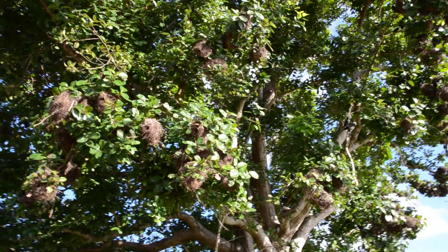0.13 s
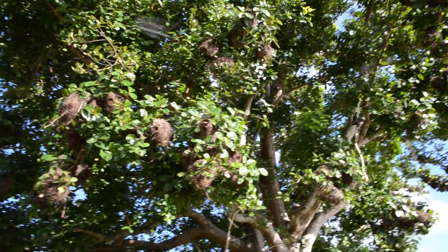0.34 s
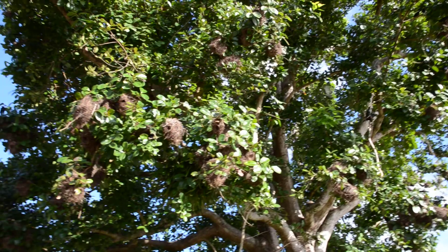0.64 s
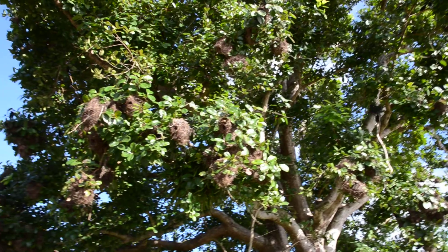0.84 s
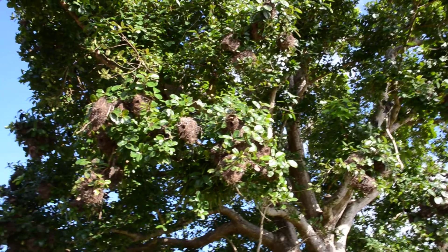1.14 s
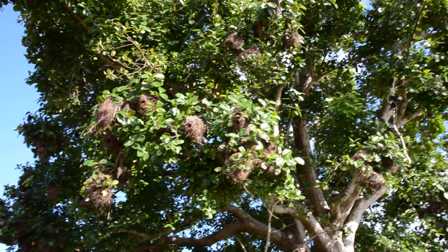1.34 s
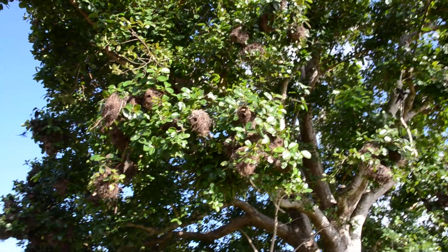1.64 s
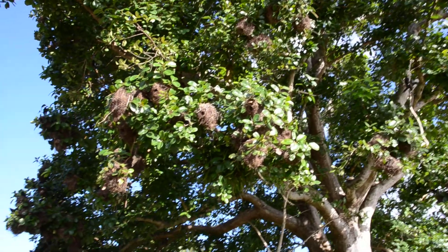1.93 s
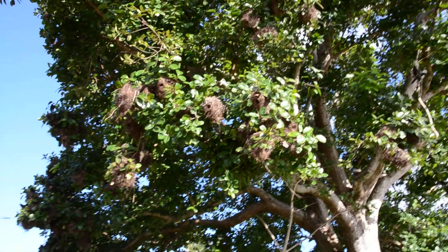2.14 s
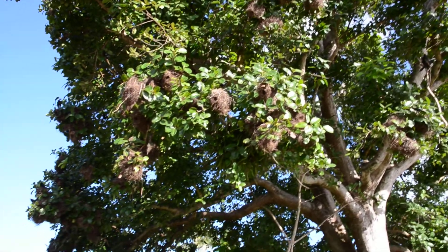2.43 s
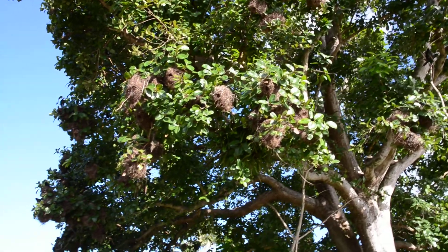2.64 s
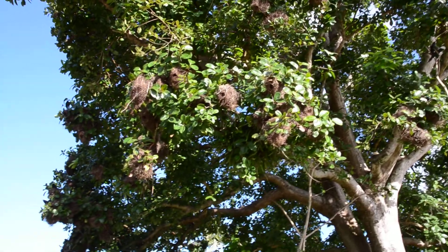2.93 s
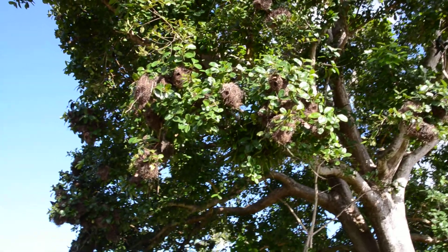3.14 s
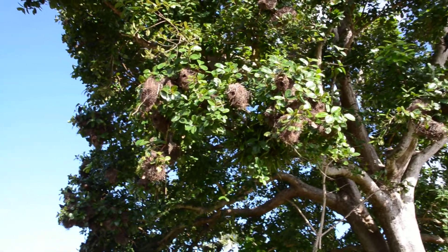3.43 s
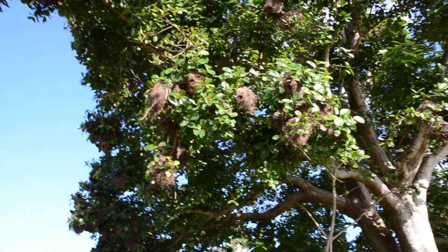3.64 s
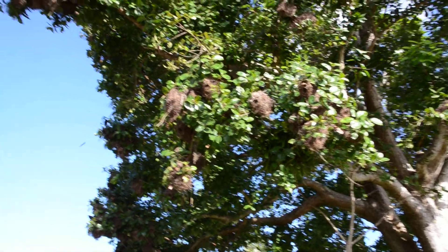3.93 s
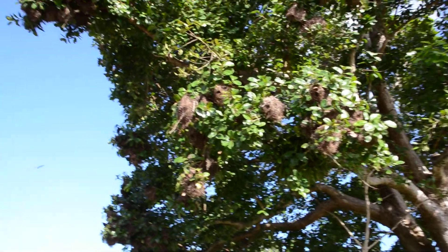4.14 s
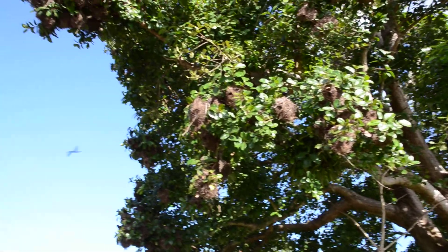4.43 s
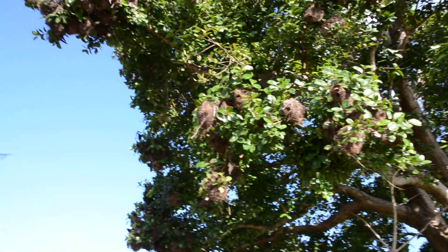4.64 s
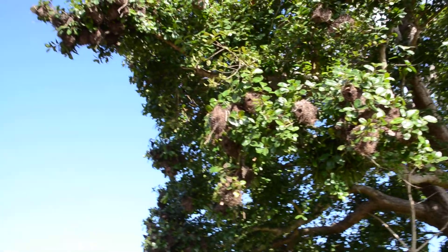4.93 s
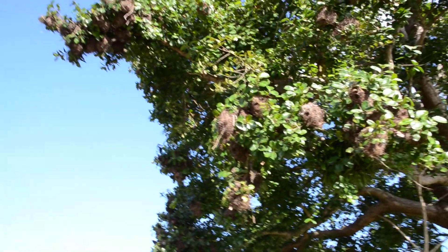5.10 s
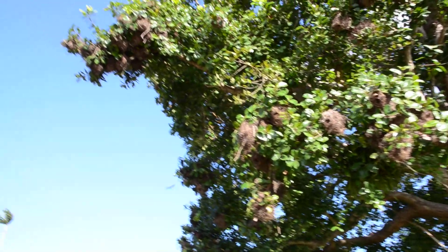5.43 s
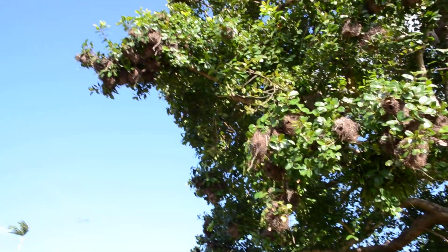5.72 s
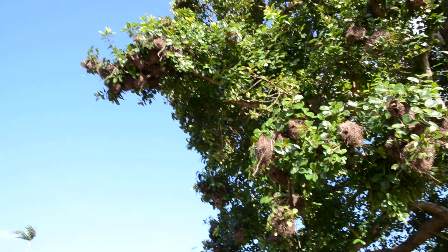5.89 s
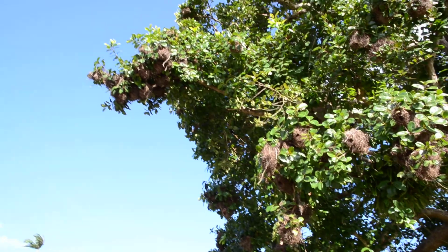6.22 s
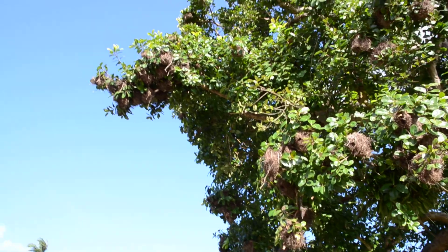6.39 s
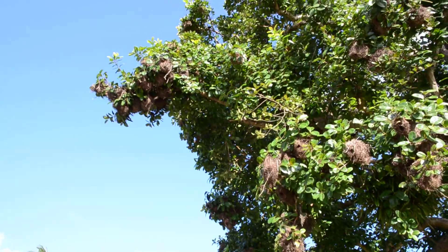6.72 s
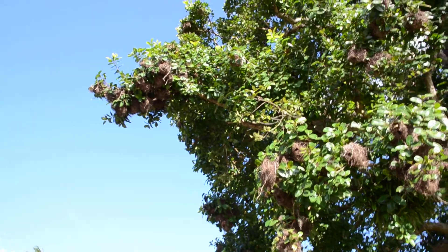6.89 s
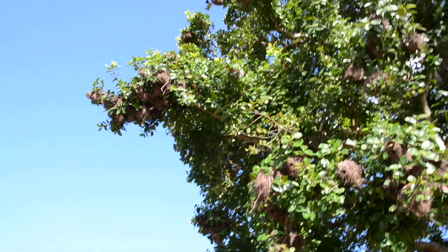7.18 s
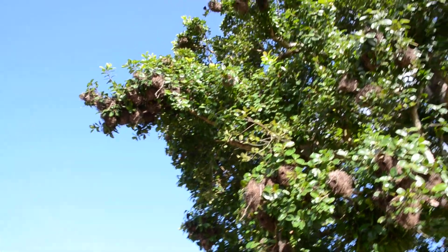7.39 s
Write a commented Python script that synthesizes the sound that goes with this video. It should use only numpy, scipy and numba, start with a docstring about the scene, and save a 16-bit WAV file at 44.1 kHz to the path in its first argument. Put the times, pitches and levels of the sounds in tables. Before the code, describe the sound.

A hand-held microphone faces a noisy bird colony in a tree. Low wind thumps open the scene over shrill continuous chatter, then mostly subside, with short puffs returning. Close birds give bright chirps, paired whistles and a reedy falling phrase; from the middle, one repeats a sagging whistle. The crowd behind swells and briefly hushes, never stopping, with slight leafy scatter and the same sound in both channels.

```python
"""Starlings chatter in a tall tree: close birds give short gliding whistles, often two at once, made of bent sines.
One of them sings a falling, reedy phrase in three harmonics; others repeat drooping whistles and two-voiced calls.
Behind them thousands of short raspy notes and a band of noise blur into a chorus among the leaves.
Wind buffets the port of one hand-held microphone as lumpy low noise and thumps, over a faint far rustle."""
import sys
import numpy as np
from scipy import signal
from scipy.fft import rfft, irfft
from scipy.io import wavfile
from scipy.ndimage import uniform_filter1d
from numba import njit

SR = 44100
rng = np.random.default_rng(int(sys.argv[2]) if len(sys.argv) > 2 else 0)


def dump(signal):
    """Clip the signal to [-1, 1] and save it as 16-bit WAV at the path in sys.argv[1]."""
    limited = np.clip(np.atleast_2d(signal).T, -1, 1)
    pcm = np.round(limited * 32767).astype(np.int16)
    wavfile.write(sys.argv[1], SR, pcm)


N = 332955
TOP_HZ = 15300  # upper limit of the sound


def undb(db):
    """Amplitude ratio of a level in dB."""
    return 10 ** (np.asarray(db) / 20)


def level(x, db):
    """Scale a sound to an RMS level in dB."""
    return x * undb(db) / np.sqrt(np.mean(x ** 2))


def curve(table):
    """Columns of a time table, one value per sample."""
    s, *columns = np.transpose(table)
    return [np.interp(np.arange(N) / SR, s, c) for c in columns]


def density_db(points, hz):
    """Spectral density between the given points, straight in dB over log frequency."""
    point_hz, point_db = np.array(points).T
    return np.interp(np.log(hz), np.log(point_hz), point_db)


def coloured(points):
    """Noise with the given spectrum."""
    hz = np.maximum(np.fft.rfftfreq(N, 1 / SR), 1)
    return irfft(rfft(rng.standard_normal(N)) * undb(density_db(points, hz)), N)


def band(x, lo_hz, hi_hz):
    """Keep the sound between two frequencies, with gentle skirts."""
    return signal.sosfilt(signal.butter(2, [lo_hz, hi_hz], "bandpass", fs=SR, output="sos"), x)


def walk(rate_hz):
    """Random values, drawn rate_hz times a second and slewed; spread near 1."""
    hold = int(SR / rate_hz)
    steps = np.repeat(rng.standard_normal(N // hold + 1), hold)
    return uniform_filter1d(steps, hold)[:N]


def far_rustle():
    """Faint broadband rustle in the distance: shaped noise whose level wanders slowly."""
    # relative spectrum of the rustle: pitch_hz [Hz], density_db [dB per Hz]
    rustle_spectrum = [(40, 4.5), (150, 0), (400, 4.5), (1000, 5.5), (2200, -9), (9000, -45)]
    return level(coloured(rustle_spectrum), -47) * undb(walk(4.64))


def gust_level_db():
    """Wind level in dB: each gust rises, holds and falls back to the calm."""
    # long gusts and brief puffs at the port: start_s [s], end_s [s] of the hold, level_db [dB]
    gust_holds = [(0, 0.302, -30), (0.368, 0.916, -31), (0.949, 1.2, -46.5), (1.553, 1.726, -34),
                  (1.786, 1.818, -39.5), (2.668, 2.86, -32), (2.86, 3.012, -35), (3.262, 3.304, -39.5),
                  (3.922, 3.95, -42), (4.16, 4.192, -40.5), (4.523, 4.542, -43), (6.356, 6.364, -39)]
    calm_db, edge_db_per_s = -53.5, 300
    t = np.arange(N) / SR
    db = np.full(N, calm_db)
    for start, end, gust_db in gust_holds:
        outside_s = np.maximum(0, np.maximum(start - t, t - end))
        db = np.maximum(db, gust_db - edge_db_per_s * outside_s)
    return db


def wind_rumble(bright=0.88):
    """Eddies break on the port in lumps; stronger wind sheds smaller, higher eddies."""
    gust_db = gust_level_db()
    lumps = undb(7.1 * np.tanh(walk(45)))
    grit = undb(13 * np.tanh(walk(70)))  # quick scatter of the small eddies
    large = level(band(rng.standard_normal(N), 59, 194) * lumps, -0.58)
    small = band(band(rng.standard_normal(N), 68, 365), 124, 1250)
    small = level(small * lumps * grit, -6)
    # the small eddies gain a further 0.88 dB for every dB of wind
    return undb(gust_db) * (large + small * undb(bright * (gust_db + 35.0)))


def buffets():
    """The hardest buffets: a few swings of the diaphragm that quicken as they die, bent by its stiffness."""
    # thumps at the port: start_s [s], relative level_db [dB], pitch_hz [Hz] that scales the swings
    thumps = [(0.035, -28, 290), (.127, -5, 264), (.243, -20, 251), (0.423, -13.5, 148), (.55, -20, 127.5),
              (.712, -16.5, 164.3), (.804, -17, 159), (.87, -20, 210), (1.64, -19.5, 231),
              (1.673, -18, 188), (1.789, -28, 160), (2.674, -22, 169), (2.734, -25, 167), (2.792, -23, 325),
              (2.811, -15.5, 337)]
    out = np.zeros(N)
    for s, db, hz in thumps:
        t = np.arange(int(3.5 * SR / hz)) / SR
        swing = np.sin(2 * np.pi * hz * t * (0.72 + 0.13 * hz * t))
        swing = swing * np.sqrt(hz * t) * np.exp(-hz * t / 1.48)
        slope = np.diff(swing, prepend=0) * SR / (2 * np.pi * hz)
        first = int(s * SR)
        out[first:first + len(t)] += undb(db) * 1.5 * (swing + 2.0 * swing * slope)
    return out


def leaves(x, t60_s=0.16, scatter_db=-13):
    """Scatter from foliage and ground: a short fading tail of noise behind the direct sound."""
    t = np.arange(int(.4 * SR)) / SR
    tail = rng.standard_normal(len(t)) * undb(-60 * t / t60_s) * (t > .004)
    tail = tail * undb(scatter_db) / np.linalg.norm(tail)
    return x + signal.fftconvolve(x, tail)[:N]


@njit
def sing(notes, waver, rasp, edge):
    """Sine notes (start, length, three pitches, dB, swell dB); pitch bends through the three, wavers and rasps."""
    out = np.zeros(len(waver))
    for start, length, a, b, c, db, swell_db in notes:
        first, count, phase = int(start * SR), int(length * SR), 0.
        gain = np.sqrt(2) * 10 ** ((db - swell_db / 2) / 20)
        grow = 10 ** (swell_db / 20 / count)
        shift = int(70 * b)  # notes of different pitch meet different stretches of chance
        for i in range(max(0, -first), min(count, len(out) - first)):
            u = 2 * i / count - 1  # -1 at the start of the note, 0 in the middle, 1 at the end
            k = (first + i + shift) % len(out)
            hz = b + u * (c - a) / 2 + u * u * ((a + c) / 2 - b) + waver[k]
            phase += 2 * np.pi * hz / SR
            gain *= grow
            fade = min(1., i / edge, (count - i) / edge)
            out[first + i] += gain * rasp[k] * fade * np.sin(phase)
    return out


def play(rows, waver_hz, rough, edge_s):
    """Notes with randomly unsteady pitch and a quick random flutter of the throat."""
    return sing(np.array(rows, float), waver_hz * walk(200), 1 + rough * walk(500), edge_s * SR)


def chorus_notes(voices, count=2000, spread_db=3.5, fall_hz=90, fade_db=-4, octave_db=3):
    """Short raspy notes at random, each with its octave; most fall, a few steeply, and others rise."""
    u, g = rng.random((count, 3)).T, rng.standard_normal((count, 3)).T
    hz = 1200 + 6200 * u[0]
    steep = np.clip((.5 + g[0]) ** 3, -8, 12)
    start_s = u[2] * N / SR
    length_s = (0.01403 + 0.062 * u[1] ** 2) / (1 + 0.1163 * np.abs(steep))  # steep notes are shorter
    pitches = np.array([hz + fall_hz * steep, hz + .6 * fall_hz * g[1], hz - fall_hz * steep])
    loud_db = spread_db * np.tanh(g[2])
    rows = []
    for k, db in (1, 0), (2, octave_db):
        weight_db = np.minimum(density_db(voices, k * hz), density_db(voices, hz))
        rows.append([start_s, length_s, *(k * pitches), weight_db + loud_db + db, fade_db + 0 * hz])
    return play(np.hstack(rows).T, waver_hz=70, rough=0.43, edge_s=0.0034)


def chorus(blur_db=-3):
    """The colony in the tree: many notes, while the furthest birds merge into a hiss; it swells and hushes."""
    # relative spectrum of the voices: pitch_hz [Hz], density_db [dB per Hz]
    voices = [(590, -57), (1000, -16.5), (1520, -16), (2260, -5), (3480, 0), (4890, 1.5), (5660, -1),
              (6200, -4), (7100, -8), (9210, -6.5), (12500, -29), (14200, -31.5), (15000, -57)]
    # course of the chorus before hushes and bursts: time_s [s], level_db [dB],
    # treble_db [dB], the treble birds above or below that level
    swells = [(0, -24, -4), (.43, -22.5, -6.5), (.95, -26, -2.5), (1.02, -20.5, -12), (1.35, -25.5, -3.5),
              (1.69, -22.5, -9), (1.9, -25, -6.5), (2.2, -23, -7.5), (2.95, -27, -4), (3.03, -20.5, -9.5),
              (3.21, -26.5, -9), (3.52, -23.5, -6), (4.13, -22, -5.5), (4.65, -23.5, -7.5),
              (4.88, -20, -8.5), (5.29, -24, -7), (5.41, -21, -8), (6.14, -25.5, -2), (6.43, -24.5, -2.5),
              (6.8, -25.5, -2), (7.17, -26, -1), (7.4, -27, 0)]
    # the colony hushes for a moment: middle_s [s], half_length_s [s], depth_db [dB] below the treble
    lulls = [(0.29, 0.05, -2), (1.845, 0.025, -3), (2.481, 0.031, -2.5), (3.756, 0.084, -4),
             (4.248, 0.031, -3.5), (5.295, 0.061, -4), (6.695, 0.073, -1.5), (7.165, 0.064, -3.5)]
    lull_treble = 2.16  # depth in the treble, times the depth below

    crowd = level(chorus_notes(voices), 0) + level(coloured(voices), blur_db)
    low_db, treble_db = curve(swells)
    t = np.arange(N) / SR
    lull_db = sum(db * np.exp(-((t - s) / half) ** 2) for s, half, db in lulls)
    low_db = low_db + lull_db
    low_db = low_db + 1.0 * np.tanh(walk(18))  # bursts of chatter lift all voices together
    treble_db = treble_db + (lull_treble - 1) * lull_db + 0.66 * np.tanh(walk(16))
    low, high = (signal.sosfilt(signal.butter(4, 5800, kind, fs=SR, output="sos"), crowd)
                 for kind in ("low", "high"))
    return level(low, 0) * undb(low_db) + level(high, 0) * undb(low_db + treble_db)


def arches():
    """A thin, very high call that arches up and down again."""
    # calls: start_s [s], level_db [dB]
    arch_calls = [(3.285, -44), (3.585, -49), (3.8, -49), (4.238, -49), (7.438, -53)]
    length_s, foot_hz, top_hz = 0.033, 10300, 11900
    return [(s, length_s, foot_hz, top_hz, foot_hz, db, -1.5) for s, db in arch_calls]


def droops():
    """One bird repeats a whistle that sags, then drops at its end."""
    # whistles: start_s [s], length_s [s] before the drop, first pitch_hz [Hz], level_db [dB]
    droop_calls = [(4.488, .11, 2893, -28), (4.738, 0.11, 2940, -23.5), (5.038, 0.055, 2960, -27.5),
                   (5.335, 0.066, 3040, -28.5), (5.636, .075, 2995, -26), (5.872, 0.091, 2970, -23.5),
                   (6.256, 0.055, 2994, -24)]
    sag_hz, drop_hz, drop_s, drop_fade_db = 232.8, 609, 0.0147, -2.5
    rows = []
    for s, d, hz, db in droop_calls:
        end_hz = hz - sag_hz
        rows.append((s, d, hz, hz - sag_hz / 3, end_hz, db, 1.5))
        rows.append((s + d - .002, drop_s, end_hz, end_hz - drop_hz / 3, end_hz - drop_hz,
                     db + drop_fade_db / 2, drop_fade_db))
    return rows


def reedy_phrase():
    """One bird's falling, reedy phrase: each note is three harmonics that glide together and ease off."""
    # notes: start_s [s], length_s [s], first_hz [Hz], last_hz [Hz], reference level_db [dB] of the harmonics
    reedy_notes = [(1.455, 0.065, 1847, 1810, -30), (1.512, 0.02, 1963, 1480, -27),
                   (1.53, 0.063, 1470, 1402, -32), (1.636, 0.085, 1410, 1218, -34),
                   (2.958, 0.049, 1900, 1754, -29), (3.018, 0.027, 1720, 1365, -32),
                   (3.045, 0.05, 1340, 1300, -38), (3.14, 0.07, 1321, 1254, -35),
                   (3.235, .13, 1227, 1096, -42), (3.58, 0.089, 1190, 1107, -39),
                   (3.779, 0.089, 1143, 1137, -38.5), (4.246, 0.076, 1150, 1132, -38)]
    # harmonics: multiple of the pitch [ratio], level_db [dB] over the reference
    harmonics = [(1, -5.5), (2, 6.5), (3, -1)]
    bend = 0.75  # share of the glide done at the middle of a note
    return [(s, d, k * a, k * (a + bend * (c - a)), k * c, db + order_db, -1.5)
            for k, order_db in harmonics for s, d, a, c, db in reedy_notes]


def whistles():
    """Near whistles, each a glide that eases off, with a faint octave where it stays in range."""
    # whistles: start_s [s], length_s [s], first_hz [Hz], last_hz [Hz], level_db [dB]
    whistle_notes = [(0.963, 0.031, 3727, 3490, -13), (1.007, 0.026, 4340, 4150, -16.5),
                     (1.052, 0.047, 3500, 3430, -24.5), (1.115, 0.05, 3880, 3610, -17.5),
                     (1.563, .059, 6840, 6200, -30), (2.094, .045, 2540, 2680, -29),
                     (2.364, 0.027, 6560, 6550, -28), (2.604, .04, 4970, 4960, -22.5),
                     (2.854, 0.088, 3370, 3080, -30.5), (2.934, 0.15, 6490, 5820, -29.5),
                     (3.188, 0.08, 3950, 3790, -25), (3.19, 0.055, 9700, 9650, -35),
                     (3.314, 0.025, 6700, 6260, -27.5), (3.58, 0.12, 6500, 5990, -28),
                     (3.787, 0.1, 9850, 9700, -41), (3.879, .014, 9700, 8100, -32),
                     (3.897, .06, 4520, 4530, -28.5), (4.1, 0.03, 6680, 6680, -23),
                     (4.27, 0.17, 9750, 9600, -39), (4.288, 0.088, 3420, 2730, -26),
                     (4.567, 0.041, 3340, 3124, -26.5), (4.605, 0.048, 5370, 5330, -26),
                     (4.82, 0.031, 6650, 6600, -24), (5.182, 0.036, 7730, 7800, -26.5),
                     (5.256, 0.14, 3740, 3660, -28), (5.203, 0.048, 2860, 2830, -28.5),
                     (5.859, 0.037, 4700, 4150, -19), (5.859, 0.019, 9200, 8570, -25),
                     (5.898, 0.043, 4840, 4790, -14.5), (5.921, 0.046, 4410, 4240, -20.5),
                     (6.194, 0.039, 4730, 4490, -17), (6.226, .03, 4550, 2266, -26),
                     (6.359, 0.041, 3980, 3900, -24), (6.403, 0.014, 1099, 739, -34.5),
                     (6.43, 0.047, 6320, 6100, -24), (6.751, 0.029, 7870, 8050, -25),
                     (6.774, 0.067, 7900, 7800, -35), (6.884, 0.051, 4570, 4520, -16.5),
                     (6.966, 0.049, 6260, 6120, -24.5), (6.97, 0.031, 4270, 4740, -21.5),
                     (7.011, 0.063, 4800, 4580, -25), (7.035, 0.14, 2404, 2194, -32),
                     (7.181, 0.027, 2585, 2510, -30), (7.191, .14, 1687, 1430, -46),
                     (7.211, 0.042, 6110, 6030, -22.5), (7.303, 0.047, 6550, 6420, -24.5),
                     (7.5, 0.045, 6250, 6140, -26)]
    glide_share = .55  # share of the glide done at the middle of a whistle
    rows = [(s, d, a, a + glide_share * (c - a), c, db, 1.5) for s, d, a, c, db in whistle_notes]
    octaves = [(s, d, 2 * a, 2 * b, 2 * c, db - 28, swell)
               for s, d, a, b, c, db, swell in rows if 2 * a < TOP_HZ]
    return rows + octaves


def duet_calls():
    """One bird's two-voiced call: each syllable ends in an upward flick, the second adds a falling chip."""
    # calls: first_flick_s [s], second_flick_s [s], first_db [dB], second_db [dB] of the syllables
    duets = [(0.041, 0.128, -20, -20), (0.711, 0.788, -17.5, -17), (1.444, 1.528, -19, -18),
             (2.363, 2.437, -21, -20), (3.45, 3.508, -19, -20.5), (4.098, 4.18, -22, -23),
             (4.822, 4.901, -23.5, -23), (7.306, 7.377, -25.5, -23)]
    # notes of a syllable: start_s [s] from the flick, length_s [s], first_hz [Hz], middle_hz [Hz],
    # last_hz [Hz], level_db [dB] over the syllable, swell_db [dB] from start to end
    first_syllable = [(-.057, .059, 4750, 4390, 4130, -0.5, 4), (-.044, 0.05, 4820, 4650, 4570, -3, 11),
                      (-.001, 0.007, 4160, 4550, 5300, -2, -3)]
    second_syllable = [(-.044, 0.042, 5140, 4440, 4300, -1, 2),
                       (-.043, 0.043, 4267, 3870, 3710, -0.33, -1.5),
                       (-.003, 0.009, 3780, 4450, 5330, 1, -2), (.023, 0.008, 5300, 4800, 3850, 1, 0)]
    rows = []
    for first_s, second_s, first_db, second_db in duets:
        for s, call_db, notes in (first_s, first_db, first_syllable), (second_s, second_db, second_syllable):
            rows += [(s + lead, d, a, b, c, call_db + db, swell_db)
                     for lead, d, a, b, c, db, swell_db in notes]
    return rows


def near_birds():
    """The close birds: bent sine whistles, with the two-voiced call wavering more in pitch."""
    rows = arches() + droops() + reedy_phrase() + whistles()
    singers = play(rows, waver_hz=37.6, rough=0.29, edge_s=0.0018)
    return singers + play(duet_calls(), waver_hz=60, rough=.25, edge_s=.0012)


def scene():
    """The tree and its birds, the wind at the port and the far rustle, alike in both channels."""
    wind = wind_rumble() + buffets()
    mono = leaves(near_birds() + chorus()) + wind + far_rustle()
    return np.array([mono, mono])


def record(dry):
    """Shape the treble: two narrow dips, then a steep cut of the top."""
    # dips: pitch_hz [Hz], width_hz [Hz], depth_db [dB]
    dips = [(5690, 330, -14), (6900, 130, -14)]
    hz = np.fft.rfftfreq(N, 1 / SR)
    dips_db = sum(db * np.exp(-np.abs(hz - f) / w * 2) for f, w, db in dips)
    heard = irfft(rfft(dry) * undb(dips_db), N)
    return signal.sosfilt(signal.ellip(8, .2, 70, TOP_HZ, fs=SR, output="sos"), heard)


dry = scene()
out = record(dry)
dump(out)
```